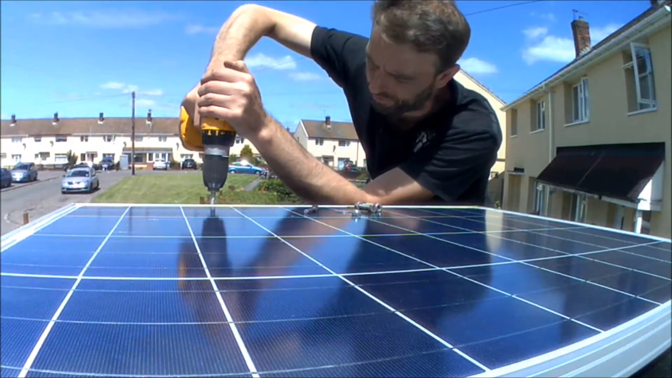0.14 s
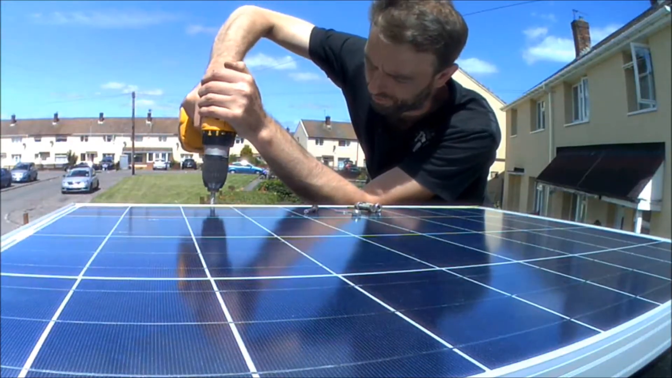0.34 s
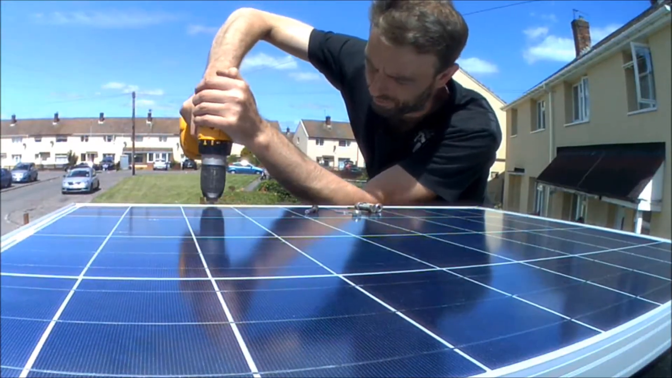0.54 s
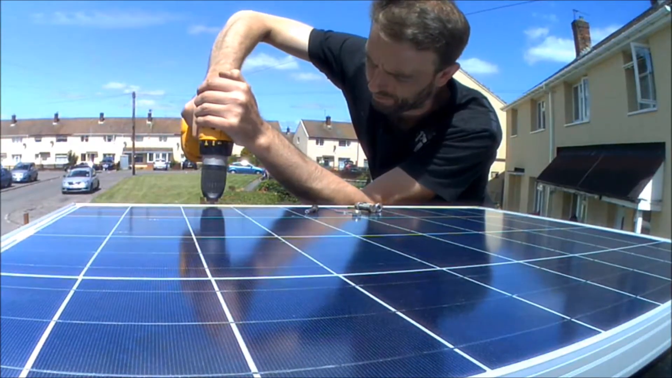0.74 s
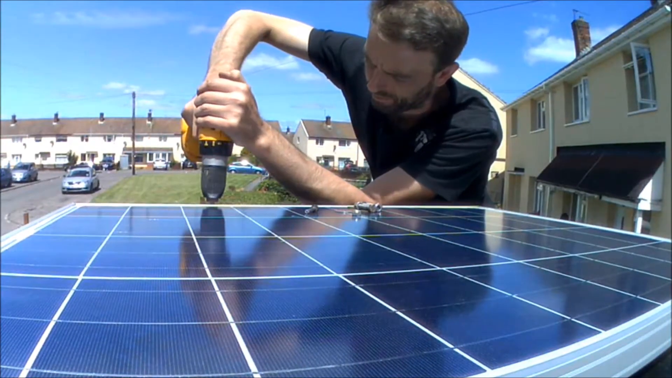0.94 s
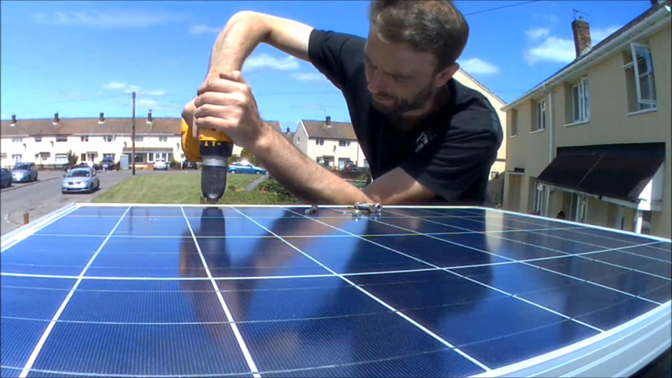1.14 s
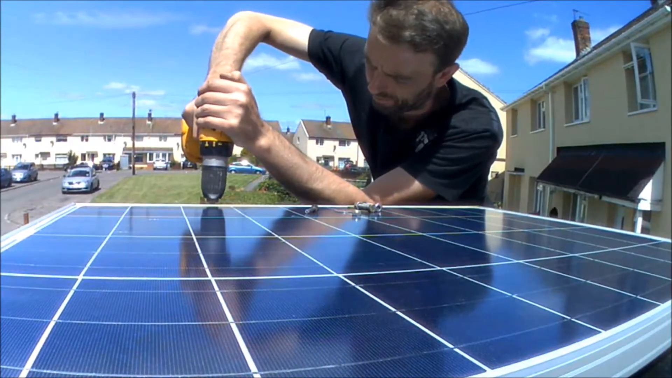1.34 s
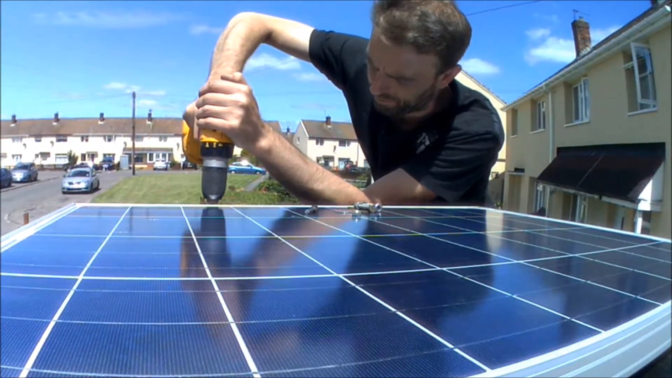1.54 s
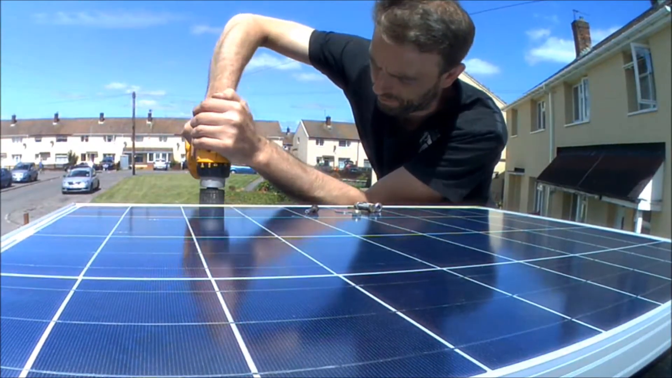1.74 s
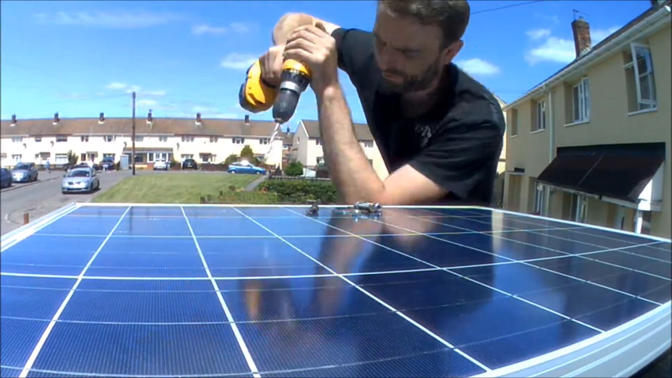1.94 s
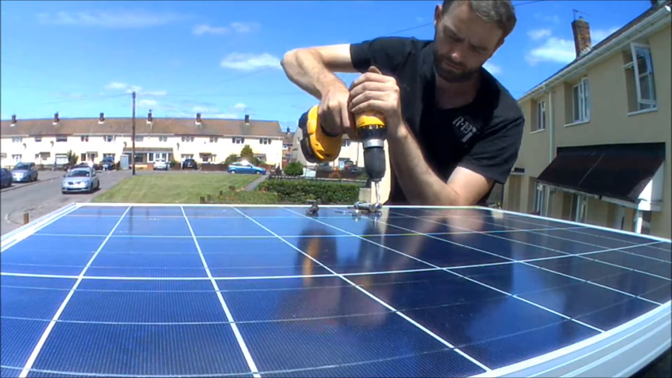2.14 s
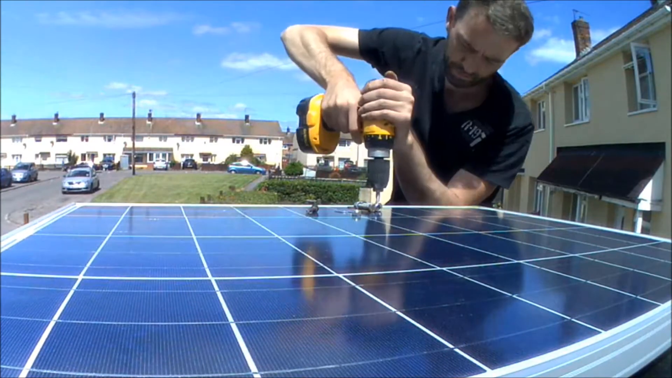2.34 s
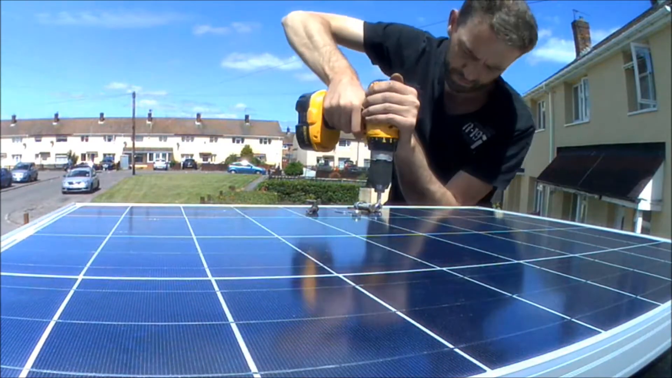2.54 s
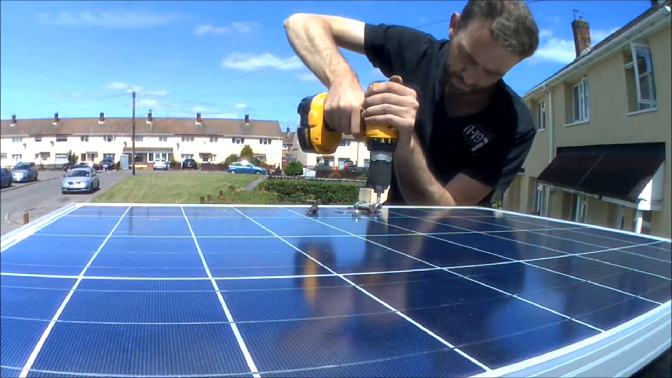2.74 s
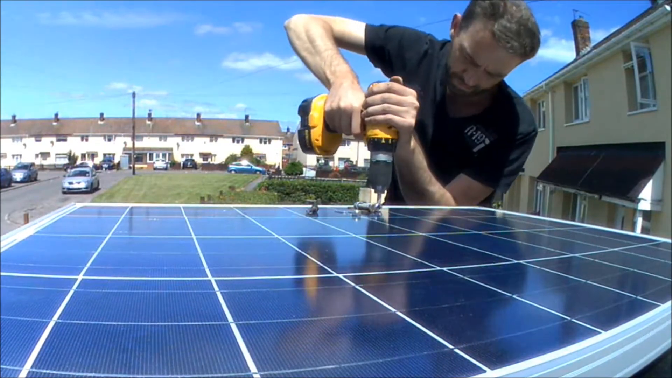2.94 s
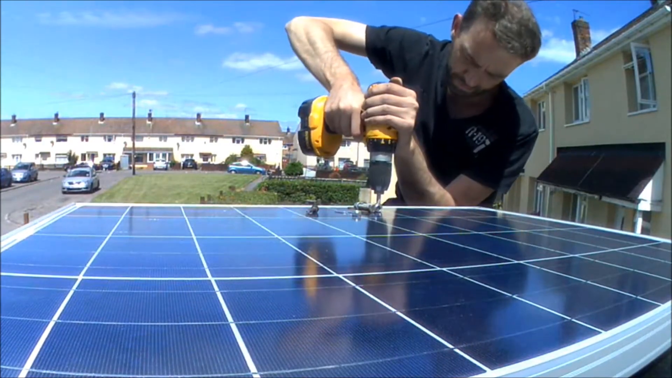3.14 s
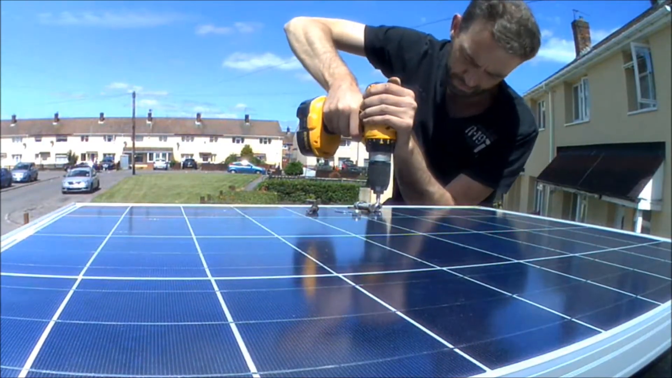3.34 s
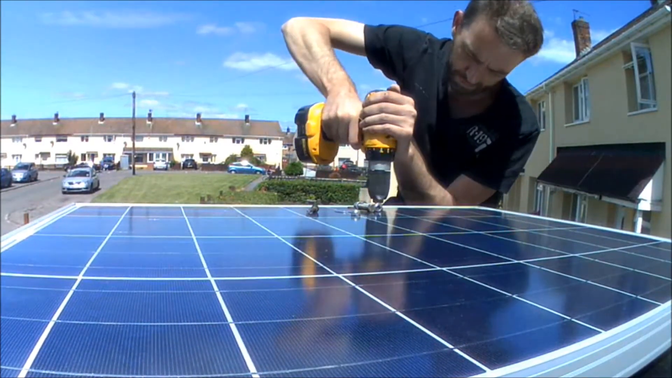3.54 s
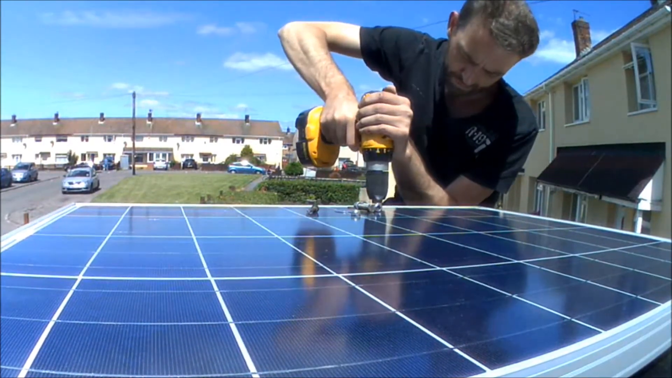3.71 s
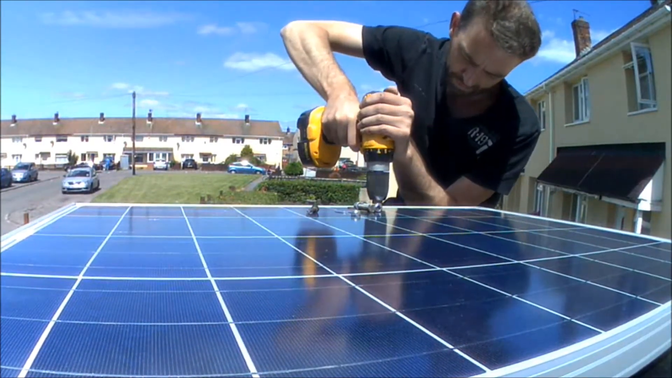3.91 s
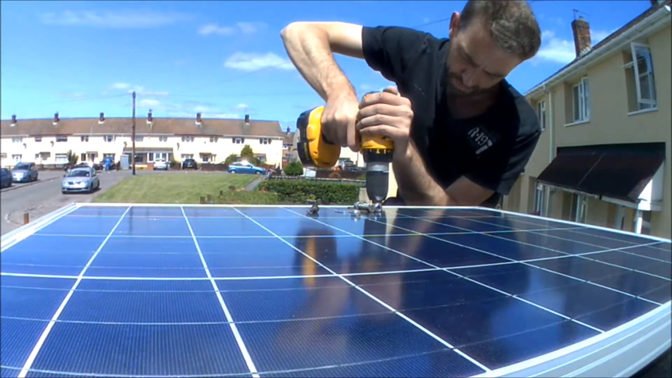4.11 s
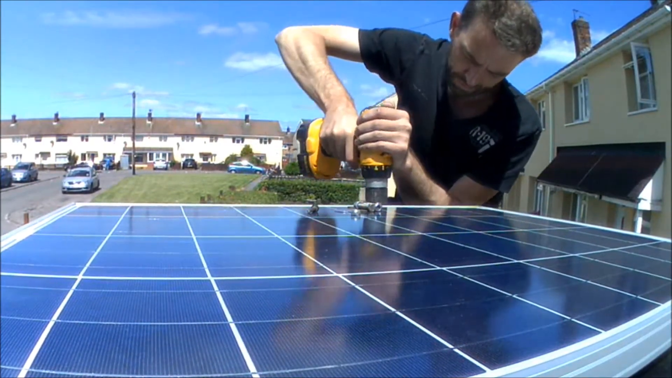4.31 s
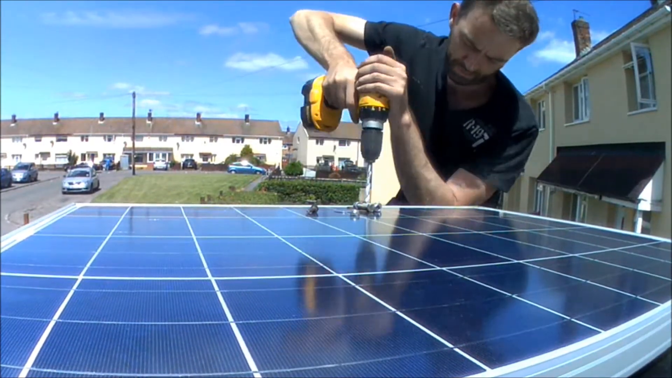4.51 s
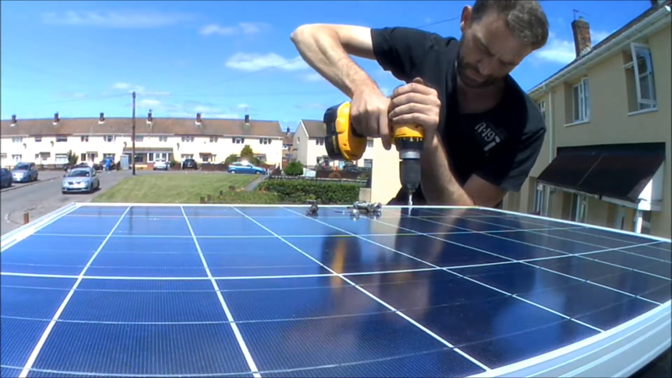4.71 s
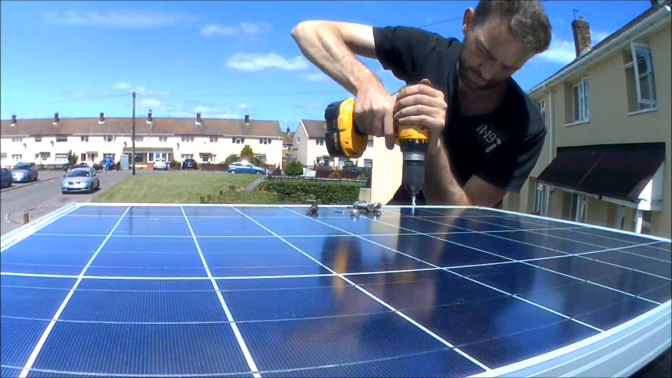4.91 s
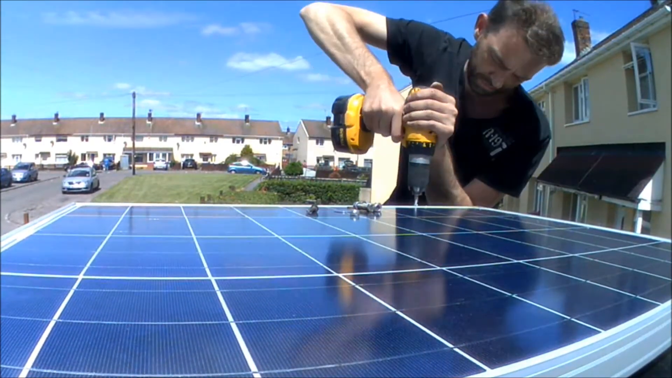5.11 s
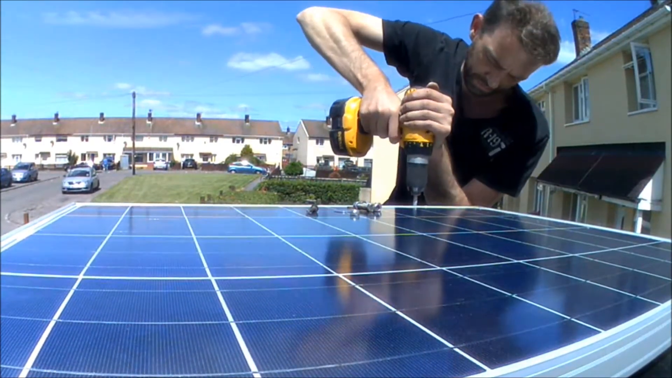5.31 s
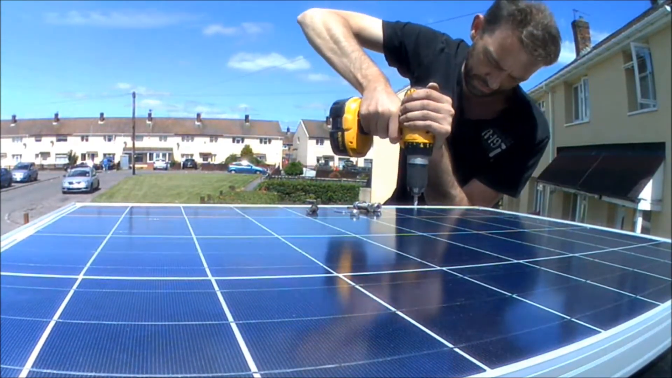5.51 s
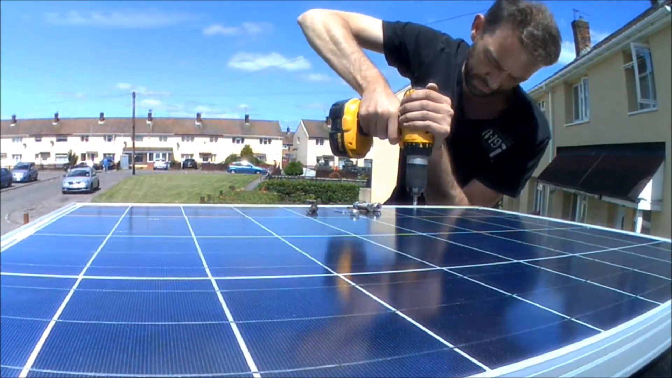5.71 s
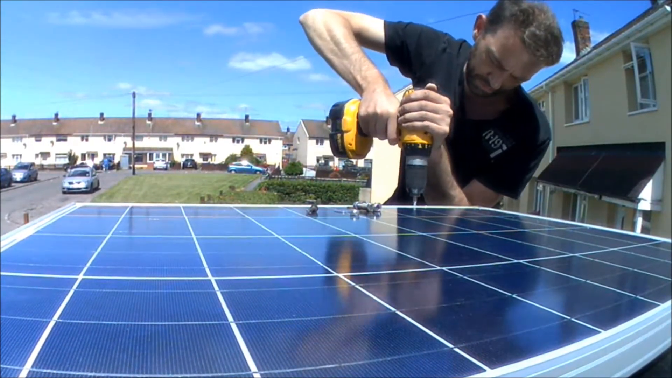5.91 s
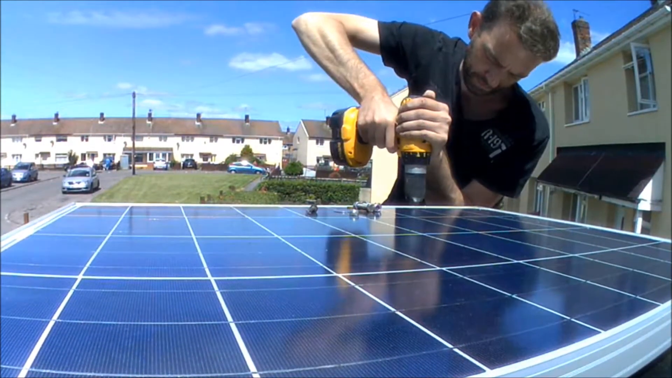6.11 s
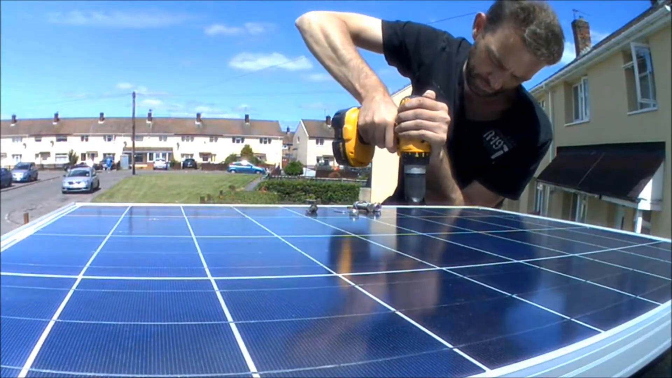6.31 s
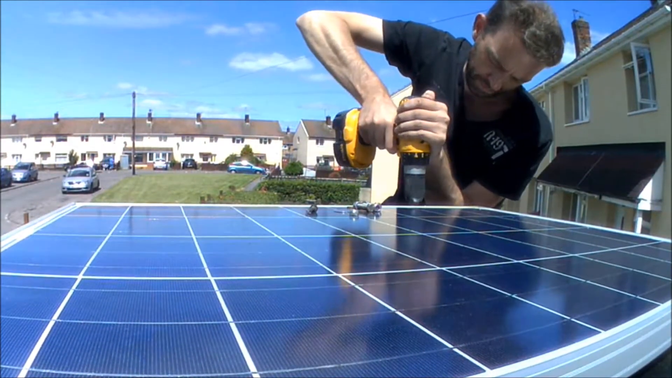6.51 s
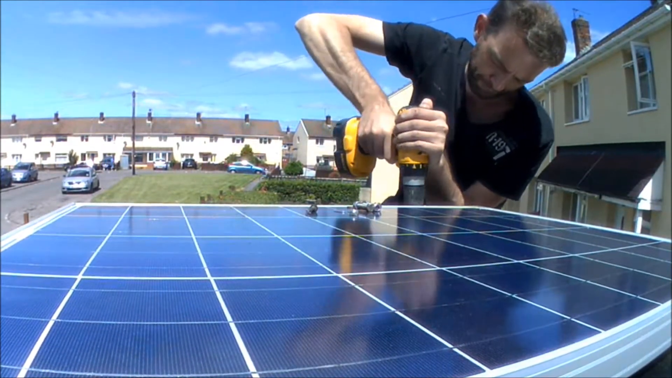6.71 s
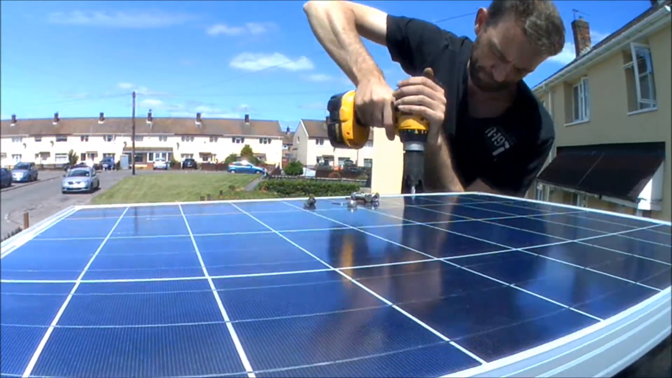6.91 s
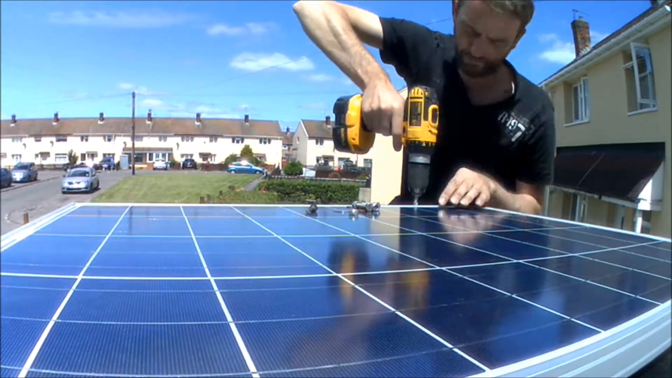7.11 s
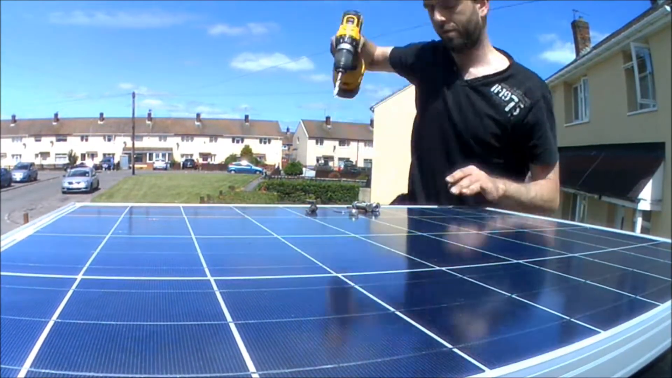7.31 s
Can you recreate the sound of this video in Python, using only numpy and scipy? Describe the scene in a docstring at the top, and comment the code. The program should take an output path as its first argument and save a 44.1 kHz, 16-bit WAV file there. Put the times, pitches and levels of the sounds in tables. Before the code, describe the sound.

An electric drill bores through metal outdoors, its whine starting and stopping between clacks and hard bangs.

```python
"""A cordless drill bores holes in the aluminium frame of a solar panel, on a roof in a quiet street.
Fan and gears whine and sag under load, the bit chatters; at each breakthrough the chuck slams on
the frame and the panel booms. The bit also taps, snags and squeals by stick-slip.
Wind buffets the microphone; birds whistle far off."""
import sys
import numpy as np
from scipy import signal
from scipy.fft import rfft, irfft, next_fast_len
from scipy.io import wavfile
from scipy.ndimage import uniform_filter1d

SR = 44100
rng = np.random.default_rng(int(sys.argv[2]) if len(sys.argv) > 2 else 0)


def master_out(mix):
    """Clip the mix to full scale and print it as 16-bit PCM to the path in sys.argv[1]."""
    frames = np.transpose(np.atleast_2d(mix))
    ceiling = np.clip(frames, -1, 1)
    pcm = np.round(ceiling * 32767).astype(np.int16)
    wavfile.write(sys.argv[1], SR, pcm)


N = 324135

# Street noise shape: f/Hz, density/dB
STREET_SPECTRUM = [(18, -12.5), (30, -0.5), (32, -13), (53, -7.5), (88, -6), (103, -3), (345, -44),
                   (962, -18.5), (2610, -17.5), (4080, -15.5), (4910, -20), (16000, -41)]
# Wind noise shape: f/Hz, density/dB
WIND_SPECTRUM = [(20, -25), (45, 5), (90, 5), (170, 7), (400, 1), (800, -2), (1500, -9.5), (4000, -37)]
# Gusts: t/s, peak/dB, rise and fall constant/s
GUSTS = [(1.619, -44, 0.073), (1.88, -37, .025), (2.9, -39, 0.054), (3.42, -45.5, 0.15),
         (3.63, -37.5, 0.13), (3.86, -41.5, 0.074), (3.97, -38.5, 0.047), (4.33, -41, 0.08),
         (4.62, -48, 0.18), (5.3, -56, .25), (5.88, -49.5, 0.21), (6.92, -42, 0.093), (7.05, -40, 0.041),
         (7.12, -42, .03), (7.19, -34, 0.039)]
# Bird calls: t/s, length/s, start f/Hz, end f/Hz, level/dB
BIRD_CALLS = [(1.953, .045, 3800, 3780, -51.5), (2.013, 0.051, 3880, 4080, -56),
              (2.075, 0.061, 4280, 4420, -56), (2.29, .04, 4150, 4300, -60),
              (4.722, 0.096, 1274, 1050, -59), (4.93, 0.082, 2100, 1950, -59),
              (4.999, 0.097, 2450, 2260, -58)]

# Squeal envelope: t/s, level/dB
SQUEAL_ENVELOPE = [(1.785, -82), (1.797, -29), (1.825, -32), (1.848, -29), (1.865, -63)]
# Frame modes: f/Hz, width/Hz, relative gain/dB
FRAME_MODES = [(1495, 410, -10.5), (2050, 186, 5.5), (2800, 750, 1.5), (3560, 510, 3), (4570, 860, 1),
               (5350, 590, 2), (6910, 1100, -1.5), (7860, 500, -6.5), (8060, 730, -4.5),
               (11500, 3400, -10.5), (14600, 1100, -4.5)]
# Panel modes: f/Hz, width/Hz, relative gain/dB
PANEL_MODES = [(189, 36, 2.5), (308.5, 32, 3.5), (440, 100, 4), (747, 235, -3.5), (880, 52, 1),
               (1250, 490, -3)]
# Modes of the struck bit and its mounting: f/Hz, relative gain/dB
STRUCK_BIT_MODES = [(1200, -2.5), (1600, -5), (1750, -3), (2100, -12.5), (2700, -3.5), (2900, -6),
                    (4350, -1.5), (4700, -3), (6550, 2)]
# Chuck, bit, trigger knocks, before trims: t/s, clack/dB, thud/dB, treble/dB, decay/s, favoured f/Hz
KNOCKS = [(0.01, -22, -51, 2, .004, 6500), (0.033, -18, -49, 0, .003, 6500),
          (0.079, -22.5, -47, 8, .004, 4350), (0.517, -17, -50, 6, 0.0032, 2880),
          (1.6342, -18, -25.5, 2.5, 0.0099, 3600), (1.702, -21.5, -36, -11, 0.0072, 2200),
          (1.752, -24, -35, -8, 0.0024, 4350), (1.9092, -8.5, -27, 6, .002, 4350),
          (1.921, -10, -52, -10, 0.0018, 6500), (2.2649, -29, -38, -18, 0.0077, 1420),
          (2.5165, -36, -32, -11, 0.0057, 1400), (3.822, -41, -24.5, -15, 0.0045, 1190),
          (3.849, -34, -27, -15, 0.0082, 1200), (3.943, -30, -27, -12, 0.0045, 1200),
          (4.318, -23, -35, -8, 0.0081, 1750), (4.355, -24, -37, -2, 0.0089, 2100),
          (4.4505, -17, -29, -13, 0.004, 2897), (4.4626, -18.5, -28.5, -2, 0.0089, 2900),
          (4.509, -7, -22.5, -9, 0.0028, 1750), (4.5166, -3, -26, -5, .004, 3660),
          (4.524, -6, -21.5, 2.5, 0.0064, 1750), (4.554, -19.5, -27.5, 10, 0.0041, 1750),
          (4.6793, -21.5, -54, -18, 0.004, 2700), (4.7245, -25, -54, -10, 0.0026, 2700),
          (4.8652, -36, -50, -21, 0.0091, 2700), (4.9528, -34, -39.5, -15, 0.0052, 2100),
          (4.9884, -34, -33, 6, 0.0038, 1400), (5.119, -17, -46, -16, .0034, 2900),
          (5.187, -12, -49, -10, 0.0028, 2914), (5.823, -13, -45, -9, .003, 2900),
          (5.876, -16, -33, -6, .003, 2710), (5.934, -20, -37, -6, .003, 4420),
          (6.758, -14, -30, 2, .006, 4700), (6.7623, -12.5, -24, 5.5, 0.01, 2100),
          (6.7932, -19, -26.5, -1, 0.0058, 4700), (6.8307, -24, -34.5, -15, 0.0049, 1750),
          (6.866, -19.5, -32, -9, .005, 1750), (6.8885, -19.5, -42, 5, 0.0059, 4700),
          (6.9432, -12, -26.5, 0, 0.0058, 2100), (7.0425, -19.5, -31, -6, 0.004, 1750),
          (7.0535, -13.5, -29.5, -1.5, 0.0042, 2700), (7.0655, -18.5, -30, -7, 0.0038, 2700),
          (7.1274, -44, -25.5, -21, 0.0032, 1770), (7.2177, -27.5, -51, 2, 0.0059, 4680),
          (7.2308, -31, -35.5, 8, 0.012, 4700), (7.2477, -10.5, -42, -2, 0.0037, 4670),
          (7.2638, -28.5, -42, 3.5, 0.0094, 4000)]
# Breakthroughs, before trims: t/s, peak/dB, snag/dB
SLAMS = [(0.5623, -1.5, -13.5), (3.5205, -2.5, -11.5), (5.9913, -4, -9)]
# Chuck landing, two bounces: delay/s, clack/dB re peak, thud/dB re peak, treble/dB, decay/s, favoured f/Hz
BOUNCES = [(0, -4, -13, 2, .0047, 1800), (.004, -5.5, -14.5, 10.5, 0.0037, 2260),
           (0.015, -10, -48, 4, .003, 2750)]

# Trigger pulls: press t/s, release t/s, spin-up constant/s, braking time/s
PULLS = [(-0.3, 0.566, 0.013, 0.079), (0.665, 1.602, 0.027, 0.069), (1.69, 1.9, 0.026, 0.059),
         (2.56, 4.297, 0.048, 0.13), (4.424, 4.522, 0.028, 0.06), (5.046, 6.757, 0.039, 0.077),
         (6.846, 6.93, 0.016, 0.05)]
# Motor speed held against the bit, one curve per pull: t/s, speed/(rev/s)
HELD_SPEEDS = [
    [(0.0, 326), (0.1, 319), (0.2, 318), (0.3, 313), (0.4, 293.5), (0.46, 287), (0.535, 286.5),
     (0.56, 275.5)],
    [(0.8, 325.5), (0.88, 320), (1.0, 317.5), (1.1, 318), (1.3, 315.5), (1.4, 312.5), (1.5, 301),
     (1.6, 286)],
    [(1.75, 316), (1.795, 325), (1.82, 297), (1.86, 305.5), (1.9, 293)],
    [(2.6, 312), (2.655, 280), (2.68, 335), (2.82, 331.5), (2.9, 321), (3.1, 310), (3.25, 303),
     (3.35, 283.5), (3.42, 279.5), (3.55, 284), (3.62, 314), (3.85, 309), (4.0, 312.5), (4.15, 304),
     (4.22, 290.5), (4.3, 276)],
    [(4.45, 266)],
    [(5.09, 302), (5.15, 343), (5.22, 324), (5.35, 320), (5.6, 302), (5.7, 291.5), (5.9, 253), (5.98, 245),
     (6.04, 311), (6.18, 305.5), (6.26, 300), (6.33, 290), (6.42, 287), (6.5, 280.4), (6.58, 257.5),
     (6.75, 235)],
    [(6.85, 218)],
]
# Work stages (skidding, cutting, open hole), base levels: start t/s, fan/dB, mesh/dB, chatter/dB, ring/dB
STAGES = [(0, -47, -45, -48, -39.5), (0.12, -44, -44, -51, -41.5), (0.65, -41, -51, -50.5, -43),
          (1.279, -38.5, -45.5, -50, -44.5), (1.68, -51, -46, -42.5, -41), (2.5, -40, -64, -70, -52),
          (2.647, -35, -63, -37.5, -44.5), (2.98, -38.5, -51, -42, -35.5), (3.3, -34.5, -50, -41.5, -39),
          (3.53, -37, -48, -43.5, -45), (4.42, -50, -66, -41, -42), (5.0, -40.5, -64, -37.5, -33.5),
          (5.3, -36, -45.5, -45.5, -30), (5.72, -43.5, -51, -42, -32.5), (6.0, -37.5, -48, -46.5, -38),
          (6.55, -39, -58, -42.5, -39), (6.83, -51, -70, -39, -34)]
# Rush of air, brushes and gears: f/Hz, density/dB
RUSH_SPECTRUM = [(60, -11), (140, -11), (400, -3), (900, 4.5), (2000, 6), (3500, 5), (5000, 0.5), (6000, 0),
                 (6700, 9.5), (7300, -0.5), (8400, 4.5), (9500, -3), (12500, -4), (16000, -5)]
# Planet carrier harmonics, from the 2nd: level/dB
CARRIER_HARMONICS_DB = (-66.5, -62.5, -66, -66, -64, -64, -71, -64, -61, -65, -80, -75, -68, -60, -82, -71)
# Blade-pass harmonics, from the 1st: relative level/dB
FAN_HARMONICS_DB = (0, -25, -21)
# Lesser gear tones: f/motor speed
GEAR_ORDERS = (6.74, 7, 19.28, 24.48, 24.8, 25.72, 34.28, 35.2, 38.57, 42.86, 43.46, 47.14)
# The same tones: level/dB
GEAR_DB = (-54, -57, -60, -56, -57, -53, -66, -66, -70, -60, -65, -65)
# Bit and frame modes under the cutting edges: f/Hz, width/Hz, relative gain/dB
CHATTER_MODES = [(446, 44, -3.5), (1747, 115, 4), (2180, 49, -7), (2684, 153, 7.5), (2964, 45, 7),
                 (3520, 210, -4.5), (4310, 67, 2), (5670, 160, -3.5), (6570, 78, 1.5), (7370, 730, -7.5),
                 (15000, 850, -10)]
# Modes of the spinning bit: f/Hz, width/Hz, relative gain/dB
SPINNING_BIT_MODES = [(4320, 410, 8.5), (4670, 253, 11), (4910, 180, 9), (5800, 1550, -3.5),
                      (10300, 1300, -12), (14800, 390, -7.5)]

CARRIER_RATIO = .14   # carrier and bit turns per motor turn
TIME_S = np.arange(N) / SR


def from_db(db):
    return 10 ** (np.asarray(db) / 20)


def unit_rms(x):
    return x / np.sqrt(np.mean(x ** 2) + 1e-20)


def curve(rows):
    return np.interp(TIME_S, *np.transpose(rows))


def add(track, start_s, piece):
    at = round(start_s * SR)
    track[at:at + len(piece)] += piece[:N - at]


def drift(rate_hz):
    """Low-passed random wander, rms about 1."""
    pole = np.exp(-40 * np.pi * rate_hz / SR)
    white = rng.standard_normal(N // 20 + 2002)   # at SR / 20
    slow = signal.lfilter([1], [1, -2 * pole, pole * pole], white)[2000:]
    return np.interp(np.arange(N) / 20, np.arange(len(slow)), unit_rms(slow))


def noise(spectrum):
    """Steady shaped noise, rms 1."""
    hz, db = np.transpose(spectrum)
    size = next_fast_len(N)
    bins_hz = np.maximum(np.arange(size // 2 + 1) * SR / size, 1)
    gain = from_db(np.interp(np.log(bins_hz), np.log(hz), db)) * np.minimum(bins_hz / hz[0], 1) ** 2
    return unit_rms(irfft(rfft(rng.standard_normal(size)) * gain, size)[:N])


def resonate(x, modes):
    """Parallel resonators, about unity gain for white noise."""
    out, power = 0, 0
    for k, (hz, width_hz, db) in enumerate(modes):
        r = np.exp(-np.pi * width_hz / SR)
        band = signal.lfilter([1, 0, -1], [1, -2 * r * np.cos(2 * np.pi * hz / SR), r * r], x + 1e-18)
        out = out + (-1) ** k * from_db(db) * (1 - r * r) / 2 * band
        power += from_db(db) ** 2 * (1 - r * r) / 2
    return out / np.sqrt(power)


def street(level_db=-56):
    """Steady rumble and faint hiss."""
    return from_db(level_db) * noise(STREET_SPECTRUM)


def wind(breeze_db=-63):
    """Lumpy buffeting at the microphone port: gusts over a light breeze."""
    gust_power = sum((from_db(db) * np.exp(-abs(TIME_S - peak_s) / fade_s)) ** 2
                     for peak_s, db, fade_s in GUSTS)
    lumps = from_db(2.5 * drift(70))
    return np.sqrt(from_db(breeze_db) ** 2 + gust_power) * unit_rms(noise(WIND_SPECTRUM) * lumps)


def birds():
    """Short gliding whistles with a slight waver."""
    out, waver = np.zeros(N), .011 * drift(150)
    for start_s, length_s, start_hz, end_hz, db in BIRD_CALLS:
        progress = np.linspace(0, 1, round(length_s * SR))
        glide_hz = start_hz + (end_hz - start_hz) * progress
        hz = glide_hz * (1 + waver[round(start_s * SR):][:len(progress)])
        envelope = from_db(db) * np.sqrt(2) * np.sin(np.pi * progress)
        add(out, start_s, envelope * np.sin(2 * np.pi * np.cumsum(hz) / SR))
    return out


def roof_echo(x, echo_db=-17, t60_s=.14):
    """Roof and nearby walls scatter a short, faint tail."""
    t = TIME_S[:SR // 4]
    tail = rng.standard_normal(len(t)) * np.exp(-np.log(1000) * t / t60_s) * (t > .003)
    return x + from_db(echo_db) * signal.fftconvolve(x, tail / np.linalg.norm(tail))[:N]


def squeal(pitch_hz=1097, harmonics_db=(-3.5, -6.5, 2.5, -5), rough_db=3):
    """Stick-slip of the dry bit against the hole wall."""
    phase = 2 * np.pi * np.cumsum(pitch_hz * (1 + .07 * drift(500))) / SR
    tone = sum(from_db(db) * np.sin(k * phase) for k, db in enumerate(harmonics_db, 1))
    gate = (TIME_S > SQUEAL_ENVELOPE[0][0]) & (TIME_S < SQUEAL_ENVELOPE[-1][0])
    return unit_rms(tone) * from_db(curve(SQUEAL_ENVELOPE) + rough_db * drift(220)) * gate


def snags_and_bounces(lead_s=.014, snag_decay_s=.007, snag_hz=3700):
    """Knock rows per slam: the bit snags, then the chuck lands and bounces."""
    rows = []
    for slam_s, peak_db, snag_db in SLAMS:
        rows.append((slam_s - lead_s, snag_db, snag_db - 14.5, 0, snag_decay_s, snag_hz))
        for delay_s, clack_db, thud_db, *timbre in BOUNCES:
            rows.append((slam_s + delay_s, peak_db + clack_db, peak_db + thud_db, *timbre))
    return rows


def knocks(clack_trim_db=-5.5, thud_trim_db=-1, treble_hz=7000, focus_db_per_oct=19, spread_db=1.5):
    """Metal-on-metal contacts: the frame clacks, the bit rings, the panel thuds."""
    clack, thud, ring = np.zeros((3, N))
    t = TIME_S[:SR // 10]
    rise = 1 - np.exp(-t / .0014)
    for start_s, clack_db, thud_db, treble_db, decay_s, favoured_hz in snags_and_bounces() + KNOCKS:
        hard, soft = rng.standard_normal((2, len(t)))
        hard = hard * rise * np.exp(-t / decay_s)
        treble = hard - signal.lfilter(*signal.butter(1, treble_hz, fs=SR), hard)
        modes = 0
        for hz, db in STRUCK_BIT_MODES:
            octaves_off = abs(np.log2(hz / favoured_hz))
            mode_db = db - focus_db_per_oct * octaves_off + spread_db * rng.standard_normal()
            modes += from_db(mode_db) * np.sin(2 * np.pi * (hz * t + rng.random()))
        add(clack, start_s, from_db(clack_db + clack_trim_db) * (hard + (from_db(treble_db) - 1) * treble))
        add(ring, start_s, from_db(clack_db) * modes * rise * np.exp(-t / (.53 * decay_s)))
        add(thud, start_s, from_db(thud_db + thud_trim_db) * soft * np.exp(-t / (1.61 * decay_s)))
    return resonate(clack, FRAME_MODES) + ring + resonate(thud, PANEL_MODES)


def slams(contact_s=.00029, highpass_hz=190, boom_db=-13):
    """Chuck hits frame: a sharp pressure pulse, then the panel's boom."""
    push = np.zeros(N)
    pulse = np.sin(np.pi * np.minimum(TIME_S[:SR // 100] / contact_s, 1)) ** 2
    for slam_s, peak_db, _ in SLAMS:
        add(push, slam_s, -from_db(peak_db) * pulse)
    crack = signal.sosfilt(signal.butter(2, highpass_hz, "high", fs=SR, output="sos"), push)
    return crack + from_db(boom_db) * resonate(push, PANEL_MODES)


def motor(free_rps=334.4, loaded_rps=274.4, jolt_loss=.25, jolt_s=.02):
    """Spins up on each pull, holds what the load allows, dips at slams, brakes on release."""
    speed_rps, load, braking = np.zeros((3, N))
    for (press_s, release_s, spin_up_s, brake_s), speeds in zip(PULLS, HELD_SPEEDS):
        held_rps = curve(speeds)
        spin_up = 1 - np.exp(-np.maximum(TIME_S - press_s, 0) / spin_up_s)
        stopping = np.clip((TIME_S - release_s) / brake_s, 0, 1)
        running = (TIME_S > press_s) & (stopping < 1)
        speed_rps += held_rps * spin_up * (1 - stopping)
        load += running * np.clip((free_rps - held_rps) / (free_rps - loaded_rps), 0, 1)
        braking += running * (stopping > 0)
    for slam_s, *_ in SLAMS:
        age = np.maximum(TIME_S - slam_s, 0) / jolt_s
        speed_rps *= 1 - jolt_loss * age * np.exp(1 - age)
    return speed_rps, load, braking


def inrush(fade_s=.036):
    """Starting current: 1 at each trigger press, then decaying."""
    return sum((TIME_S > press_s) * np.exp(-abs(TIME_S - press_s) / fade_s) for press_s, *_ in PULLS)


def effort_db(speed_rps, load, braking, fan_full_rps=272, fan_faded_rps=265):
    """Load and braking press gears and bit harder; the fan whine drops when slow, surges on inrush."""
    starts_s, *levels_db = np.transpose(STAGES)
    stage = np.searchsorted(starts_s[1:], TIME_S)
    fan_db, mesh_db, chatter_db, ring_db = np.array(levels_db)[:, stage]
    slow = np.clip((fan_full_rps - speed_rps) / (fan_full_rps - fan_faded_rps), 0, 1)
    extra_load = load - .5
    fan_db += 11 * inrush() - 9 * slow
    mesh_db += 7.5 * extra_load + 9.5 * braking
    chatter_db += 8 * extra_load + 4.5 * braking
    ring_db += 3.5 * extra_load
    return uniform_filter1d([fan_db, mesh_db, chatter_db, ring_db], size=1300, axis=1)


def rush(turns, level_db=-40, throb_db=-.9, rattle_db=1.5):
    """Air, brush and gear noise, throbbing twice per carrier turn."""
    throb = np.cos(2 * np.pi * 2 * CARRIER_RATIO * turns)
    return from_db(level_db + throb_db * throb + rattle_db * drift(260)) * noise(RUSH_SPECTRUM)


def gear_hum(turns):
    """Low buzz: the gearbox repeats on each carrier turn."""
    return np.sqrt(2) * sum(from_db(db) * np.sin(2 * np.pi * (k * CARRIER_RATIO * turns + rng.random()))
                            for k, db in enumerate(CARRIER_HARMONICS_DB, 2))


def whine(turns, engaged, fan_db, mesh_db, blades=15, mesh_order=26.94, flutter_db=1.07, sway_rad=.44):
    """Blades and teeth sing at multiples of motor speed; the carrier sways fan and lesser gear tones."""
    angle = 2 * np.pi * turns
    sway = sway_rad * np.sin(CARRIER_RATIO * angle)
    fan = sum(from_db(db) * np.sin(k * (blades * angle + sway)) for k, db in enumerate(FAN_HARMONICS_DB, 1))
    mesh = from_db(mesh_db + flutter_db * drift(40)) * np.sin(mesh_order * angle)
    gears = sum(from_db(db + flutter_db * drift(120)) * np.sin(order * angle + sway)
                for order, db in zip(GEAR_ORDERS, GEAR_DB))
    fan *= from_db(fan_db + flutter_db * drift(47))
    return np.sqrt(2) * (fan + (mesh + gears) * engaged ** 1.5)


def cutting(turns, chatter_db, ring_db, grit_db=3.5, rough_db=3):
    """Two cutting edges bite unevenly on each bit turn, shaking bit and frame."""
    angle = 2 * np.pi * CARRIER_RATIO * turns
    edges = np.cos(2 * angle) * (.75 + .15 * drift(4))
    bite_db = 5.5 * (edges + .3 * np.cos(angle) + .3 * np.cos(4 * angle) + .4 * np.cos(6 * angle))
    scrape = unit_rms(rng.standard_normal(N) * from_db(bite_db + grit_db * drift(173)))
    rub = unit_rms(rng.standard_normal(N) * from_db(.41 * bite_db + rough_db * drift(200)))
    chatter = resonate(scrape * from_db(chatter_db + 2.5), CHATTER_MODES)
    return chatter + resonate(rub * from_db(ring_db + 2), SPINNING_BIT_MODES)


def drill(nominal_rps=310, jitter=.0011):
    """Rush, hum, whine and cutting swell and fade with motor speed."""
    speed_rps, load, braking = motor()
    fan_db, mesh_db, chatter_db, ring_db = effort_db(speed_rps, load, braking)
    pace = np.maximum(speed_rps, 0) / nominal_rps + 1e-9
    engaged = np.minimum(pace / .85, 1)
    stutter = .12 * (1 - engaged) * drift(400)   # a slow motor runs unevenly
    turns = np.cumsum(speed_rps * (1 + jitter * drift(26.5) + stutter)) / SR
    return ((rush(turns) + gear_hum(turns)) * pace ** .99
            + whine(turns, engaged, fan_db, mesh_db) * engaged ** 1.4
            + cutting(turns, chatter_db, ring_db) * engaged ** 1.7)


def scene():
    """Drilling with its roof echo, over birds, wind and street; mono."""
    work = roof_echo(drill() + knocks() + slams() + squeal())
    return (work + birds() + wind() + street())[None]


def record(dry):
    """Steep low-pass; converter DC offset."""
    cutoff_hz, dc_offset = 16100, -.0118
    return signal.sosfilt(signal.ellip(12, .1, 70, cutoff_hz, fs=SR, output="sos"), dry) + dc_offset


dry = scene()
out = record(dry)
master_out(out)
```